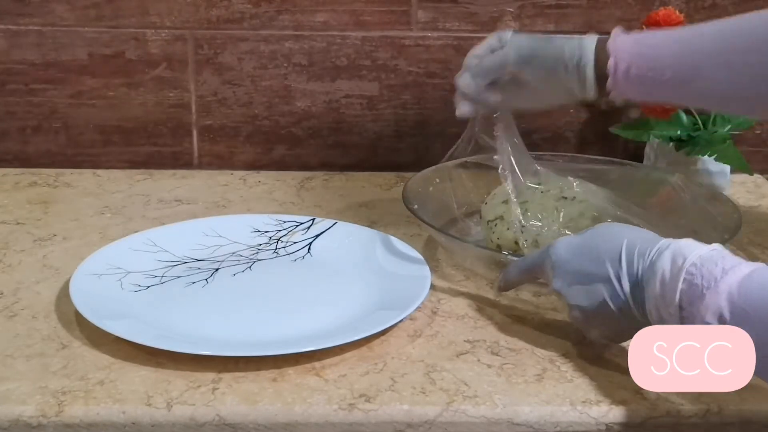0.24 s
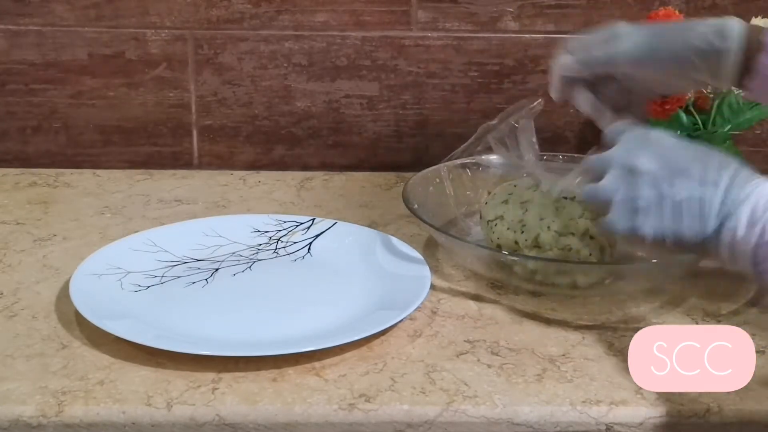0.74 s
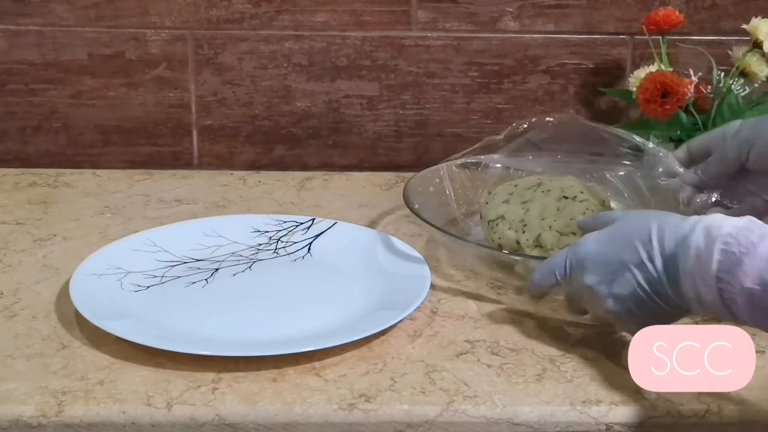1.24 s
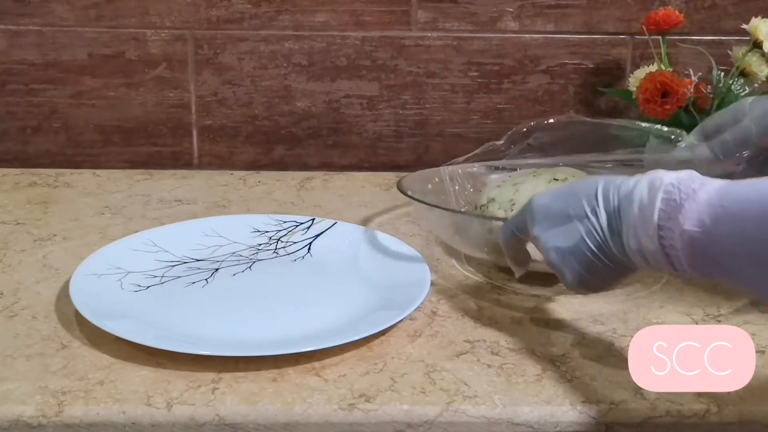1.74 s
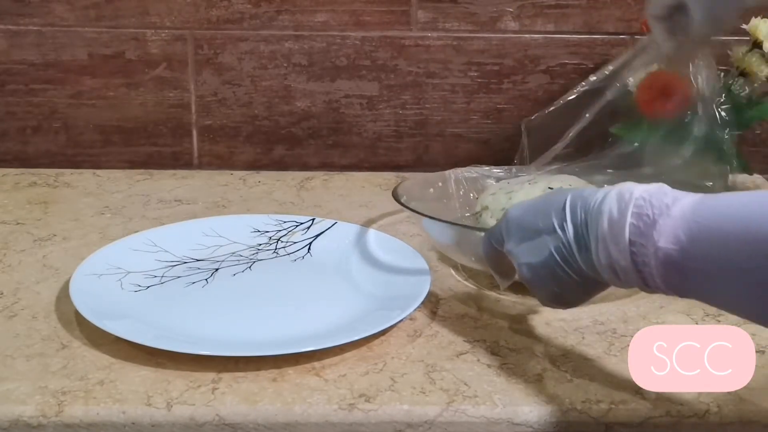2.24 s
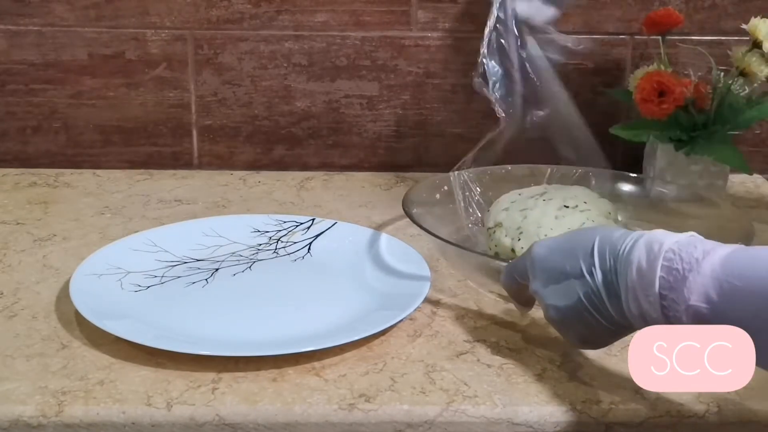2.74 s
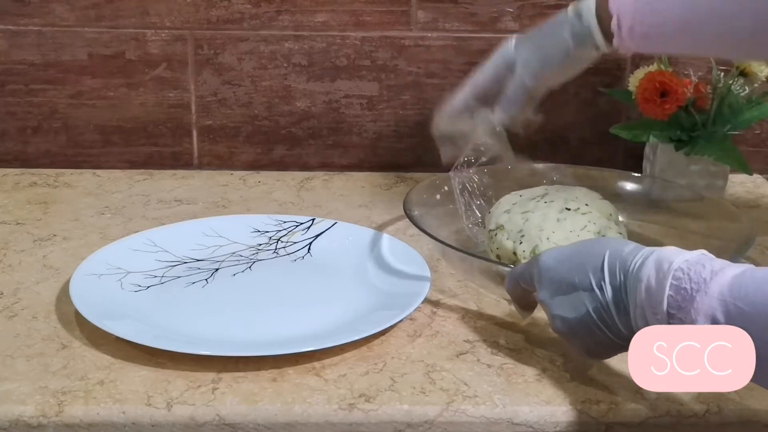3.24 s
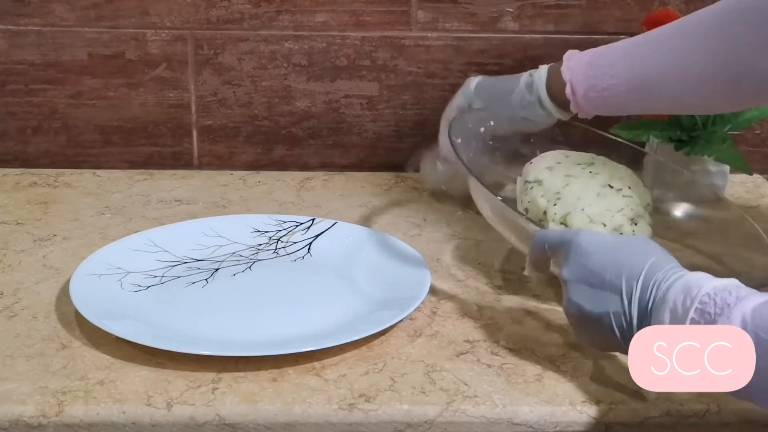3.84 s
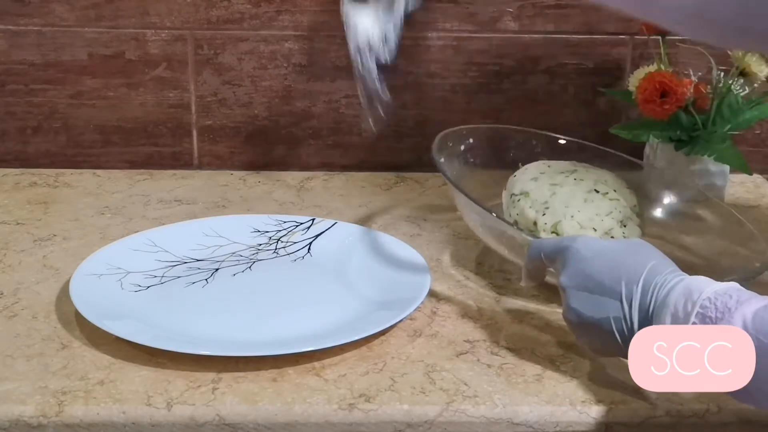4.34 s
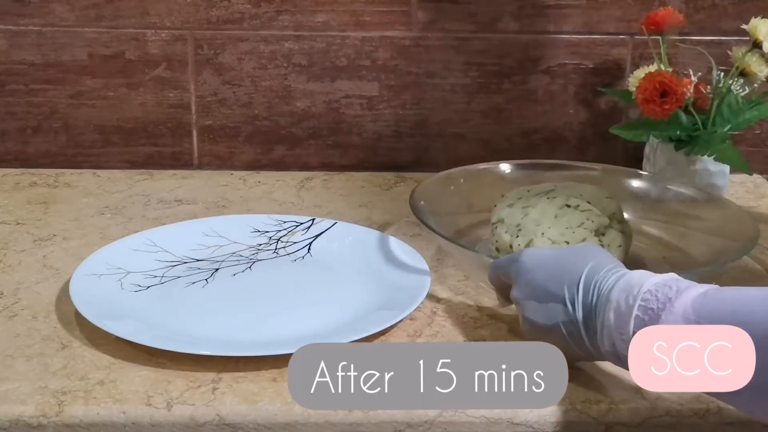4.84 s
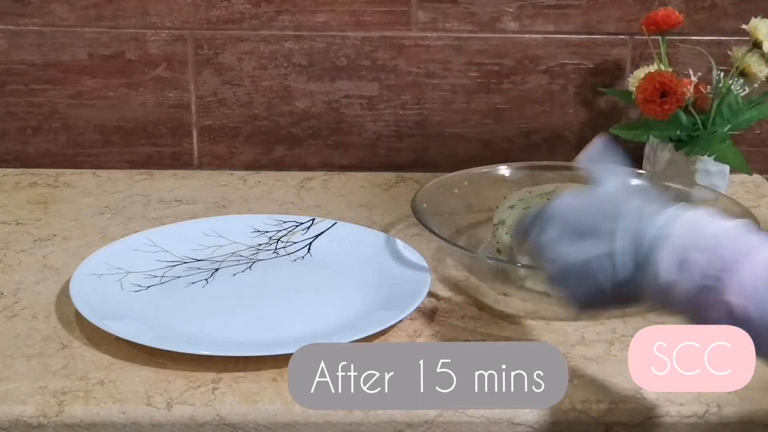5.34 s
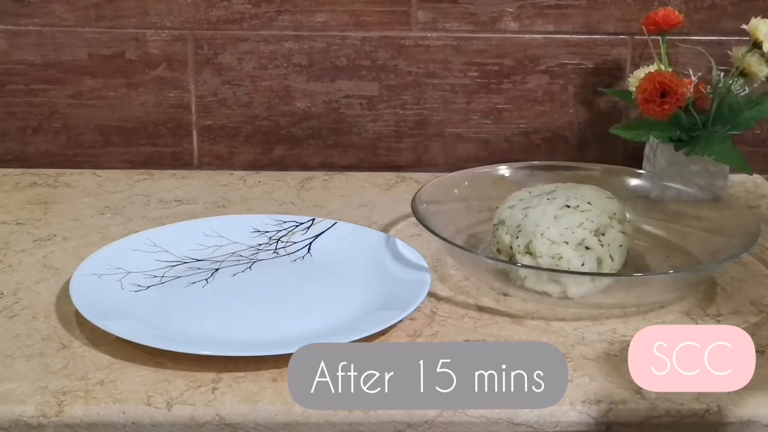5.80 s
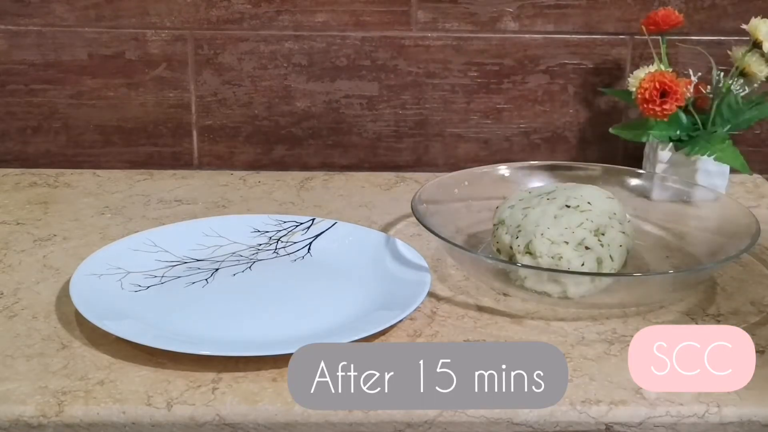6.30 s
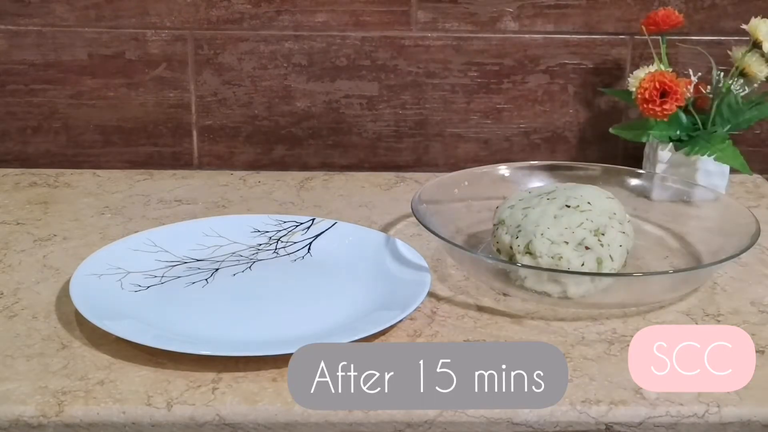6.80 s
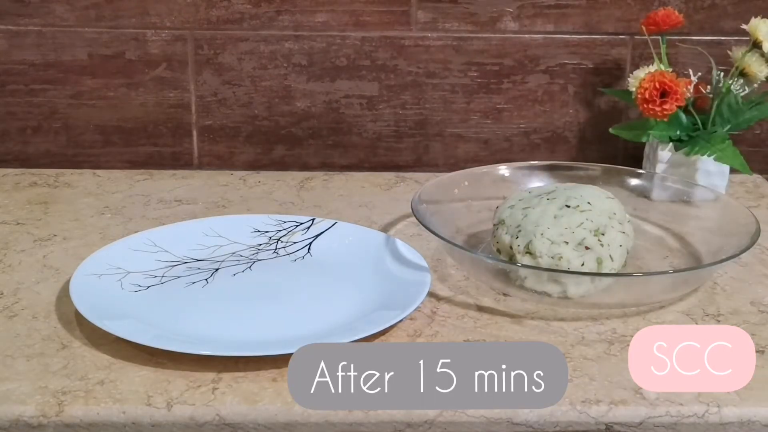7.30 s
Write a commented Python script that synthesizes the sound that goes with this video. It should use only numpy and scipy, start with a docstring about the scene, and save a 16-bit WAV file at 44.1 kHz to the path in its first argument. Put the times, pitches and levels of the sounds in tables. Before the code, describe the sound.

Close, quiet stereo recording in a tiled kitchen. Cling film crinkles faintly, then crackles harder as gloved hands peel it from a heavy glass bowl. The bowl clunks on the stone counter, gloves scuff and catch on the glass, and a last sharp rip frees the film. A soft brush follows as the bowl is lowered, then off-side crumpling and a few bright ticks over faint hiss.

```python
"""Cling film crinkles as gloved hands peel it off a glass bowl in a tiled kitchen: random crease snaps, filtered.
Gloves rub on the bowl: grainy noise and gliding friction tones. The bowl knocks on a stone counter: filtered clicks
and decaying sines. Sharp ticks are band-passed clicks; a soft brush is shaped noise as the bowl is lowered.
The film is crumpled off to the right and put down with a few ticks, over rumble, hiss and hum.
The sound stops shortly before the end."""
import sys
import numpy as np
from scipy import signal
from scipy.fft import rfft, irfft
from scipy.io import wavfile
from scipy.ndimage import uniform_filter1d

SR = 44100
rng = np.random.default_rng(int(sys.argv[2]) if len(sys.argv) > 2 else 0)


def dump(signal):
    """Clip the signal to [-1, 1] and save it as 16-bit WAV at the path in sys.argv[1]."""
    limited = np.clip(np.atleast_2d(signal).T, -1, 1)
    pcm = np.round(limited * 32767).astype(np.int16)
    wavfile.write(sys.argv[1], SR, pcm)


N = 333275
TIME_S = np.arange(N) / SR

# Levels are relative: each source also has its own gains. Pan is left over right.
# pulls or squeezes of the film: start_s, swell_s, hold_s, crinkle_level_db, fine_share_db
PULLS = [(0.0, 0.0044, 0.34, -63.5, -20), (0.829, 0.12, 0.019, -58.5, -3), (1.013, .045, 0.022, -65, -18),
         (1.42, 0.047, 0.16, -59, -11), (1.803, .15, 0.08, -53, -5.5), (2.07, 0.033, 0.18, -58, -6),
         (2.358, 0.034, 0.014, -56, -6.5), (2.709, 0.045, 0.094, -48, -6.5), (2.922, 0.016, 0.1, -54, -8.5),
         (3.149, 0.035, 0.023, -60, -11), (3.399, .11, 0.041, -58, -8), (3.611, 0.05, 0.018, -48, -8),
         (3.706, .06, 0.14, -50.5, -6), (3.846, 0.044, 0.085, -47, -8), (3.999, 0.035, 0.047, -45, -14),
         (5.197, .06, 0.031, -65.5, -11), (5.48, .08, 0.034, -62, -10), (5.6, 0.052, 0.11, -55.5, -8),
         (5.692, 0.046, 0.073, -50, -11), (5.874, 0.017, 0.063, -50, -8.5), (6.222, 0.074, 0.025, -52, -12),
         (6.346, 0.029, 0.27, -61.5, -8.5), (7.024, 0.041, 0.13, -65.5, -7.5)]
# folds giving way in a rush of snaps: start_s, level_db, fade_s, fine_share_db, fold_share_db
RUSHES = [(0.0, -62.5, 0.03, -11, 0), (0.11, -65.5, .06, -7, 3.5), (0.305, -51, 0.022, -8, -5),
          (0.36, -67.5, 0.22, -20, -4.5), (0.579, -61, 0.014, -4, -3), (1.17, -70, 0.094, -29, 8.5),
          (1.809, -56.5, 0.027, -15, -0.5), (2.12, -67, 0.026, -8, -7), (2.539, -57.5, 0.04, -1, -11),
          (2.634, -38.5, 0.025, -12, -4.5), (2.771, -49.5, 0.019, -18, 9), (2.929, -42, 0.026, -8, -3.5),
          (4.026, -37, 0.022, -6, -9), (5.619, -49, 0.047, -7, -32.5), (5.99, -53, 0.059, -22, -1.5),
          (6.059, -44, 0.037, -36, -0.5), (6.108, -37.5, 0.0096, -11, -6), (6.29, -54, 0.021, -12.5, -2.5),
          (6.511, -50.5, 0.011, -3, -2), (6.729, -49.5, 0.016, -2, -13)]
# spectrum of ordinary crinkle: freq_hz, level_db
CRINKLE_COLOUR = [(1500, -40), (3000, -22.5), (4200, -14), (5300, -5), (6400, -5.5), (7150, 3), (8000, -6),
                  (9000, -13), (10200, -14), (12000, -29), (16000, -39)]
# spectrum of the finest snaps: freq_hz, level_db
FINE_COLOUR = [(7000, -24.5), (9500, -2.5), (11000, -2), (12500, -1.5), (13800, -1.5), (15000, -4),
               (16000, -1)]
# spectrum of the big folds: freq_hz, level_db
FOLD_COLOUR = [(300, -45.5), (900, -7.5), (1500, -3), (2300, -1.5), (3100, 0), (3700, -4), (4300, -10.5),
               (6000, -16.5)]
# position of the film: time_s, pan_db
FILM_PAN = [(0, 1), (2, -2), (4.2, -1.5), (5.6, -1.5), (6.3, -2.5), (6.75, -5), (7.3, -2)]
# a glove shifts its grip on the bowl: start_s, hold_s, level_db
SCUFFS = [(0.149, 0.062, -68), (0.295, 0.012, -57.5), (0.89, 0.14, -72), (1.981, 0.05, -59),
          (2.108, .02, -60), (2.277, 0.14, -62), (2.758, 0.095, -47.5), (2.915, 0.035, -56),
          (3.433, 0.1, -66.5), (3.637, .035, -53.5), (3.87, 0.092, -70.5), (4.51, 0.24, -67),
          (5.82, 0.28, -65.5), (6.042, 0.035, -58.5)]
# spectrum of the rubbing: freq_hz, level_db
RUB_COLOUR = [(150, -15), (400, -3), (650, -0.5), (880, 1), (1150, 0), (1550, -9.5), (2300, -18.5),
              (4000, -45.5)]
# stick-slip as the bowl is tipped up and let back, one list per stroke: time_s, level_db, pitch_hz
SLIPS = [
    [(3.54, -74, 1063), (3.62, -62, 1180), (3.65, -47, 1134), (3.68, -69, 993)],
    [(4.0, -53.5, 880), (4.04, -54, 1105), (4.075, -52, 776), (4.17, -87, 770)],
]
# faint glove squeak: time_s, level_db, pitch_hz
SQUEAK = [(5.22, -82, 2920), (5.27, -69, 2972), (5.3, -82, 2895)]
# bowl meets counter: start_s, strength_db, contact_cutoff_hz, thump_share_db
KNOCKS = [(1.448, -22, 1090, -33), (1.461, -14.5, 3470, -37), (1.467, -3.5, 2560, -28),
          (1.474, -19, 1510, -31), (1.81, -27, 2480, -7), (2.6271, -22, 910, -16.5),
          (2.636, -16, 3514, -23.5), (2.656, 5, 2470, -30.5), (2.662, -14, 1700, 2.5),
          (2.931, -24, 3460, -26), (4.966, -17.5, 1430, -13), (4.981, -34.5, 1430, 15.5),
          (6.118, -23.5, 1163, -11)]
# spectrum of the contact: freq_hz, level_db
KNOCK_COLOUR = [(120, -36), (230, -1), (380, -16.5), (550, 3.5), (850, -4), (1150, 0), (1500, -3),
                (2100, -11.5), (2800, -10.5), (3600, -32), (6000, -41)]
# ringing modes of the loaded bowl on the counter: freq_hz, level_db, t60_s
BOWL_MODES = [(206.6, -10, 0.6), (312, -15, 0.07), (446, -15.5, 0.2), (521.4, 1, 0.46), (600, -12.5, 0.79),
              (664, -16, .3), (728, -0.5, 0.64), (847, -5.5, 0.65), (870, -1, 0.3), (983, -13.5, 0.13),
              (1130, -6.5, 0.5), (1280, -6, 0.29), (1220, -11, .3), (1440, -14, 0.4), (1480, -15.5, 0.27),
              (1630, -14, .45), (2590, -12.5, 0.34)]
# single sharp ticks: start_s, energy_db, centre_hz, width_hz, pan_db
TICKS = [(1.437, -38, 5500, 3000, 1), (1.811, -28, 6600, 4000, -1.5), (2.6282, -21, 5670, 1800, -14),
         (2.634, -21, 6400, 3497, 4.5), (2.636, -9.5, 6280, 3000, -1), (2.643, -15, 6880, 1795, -23),
         (2.93, -25, 6700, 4030, -1), (4.029, -28, 6930, 3500, 6), (5.372, -27.5, 7300, 1090, -8.5),
         (5.831, -24, 6800, 4000, 5), (6.112, -13, 6760, 4020, -1.5), (6.516, -26, 6900, 3950, 1.5),
         (6.6946, -16, 7370, 2590, -4.5), (6.6942, -26, 12600, 5000, -7.5),
         (6.7306, -18.5, 12600, 5020, -13.5), (6.7415, -25.5, 12500, 5000, -8),
         (6.882, -32.5, 6800, 3000, -2), (6.9241, -1, 6300, 2020, -8), (6.9244, -22.5, 11600, 7000, -11),
         (6.923, -20, 3190, 655, -3.5), (6.924, -32, 950, 497, -13), (7.130, -28.5, 7000, 2490, 3.5)]
# soft brushing, likely the sleeve, as the bowl is lowered: time_s, level_db
BRUSH = [(4.3, -91), (4.36, -65), (4.45, -52.5), (4.58, -50.5), (4.7, -55.0), (4.8, -56.5), (4.9, -61.5),
         (4.93, -98)]
# spectrum of the brushing: freq_hz, level_db
BRUSH_COLOUR = [(300, -18), (700, -9.5), (1100, -6), (1700, -12.5), (2500, -14.5), (3200, -8.5),
                (4000, -16.5), (5300, -2), (6100, 1), (6500, -3), (7050, 4), (8600, -5), (11000, -15.5),
                (15500, -20)]
# spectrum of rumble and hiss: freq_hz, level_db
FLOOR_COLOUR = [(12, -39), (20, 7), (181, -1.5), (326, -4), (524, -4), (603, -9.5), (713, -10),
                (1390, -18.5), (2960, -16), (4020, -22), (6290, -15.5), (7230, -10), (9300, -26),
                (14500, -26), (15800, -20.5)]
# appliance hum: freq_hz, rms_db
HUM = [(59.3, -76), (118.6, -77), (176, -78.5), (234, -80.5)]
# decay of the room: freq_hz, t60_s
ROOM_T60 = [(150, 0.75), (400, 0.5), (1000, 0.32), (2800, 0.42), (6000, 0.44), (9000, 0.29), (15000, 0.39)]
# likeness of left and right in diffuse sound: freq_hz, correlation
ROOM_LIKENESS = [(30, .35), (70, 0.036), (150, 0.44), (300, 0.56), (650, 0.25), (1400, 0), (4000, 0.022)]

PULL_RELAX_S = 0.035  # time for the crinkle amplitude to fall by 1/e
PULL_FOLD_SHARE_DB = -7.5  # big folds against crinkle
RESTING_DB, RESTING_FINE_SHARE_DB, RESTING_FOLD_SHARE_DB = -73, -7.5, -5
SCUFF_SWELL_S, SCUFF_RELAX_S = 0.012, 0.022
RUB_WITH_FILM_DB, RUB_WITH_SLEEVE_DB, RUB_RESTING_DB = -18.5, -17.5, -79
TICK_LAG_S_PER_DB = 0.000035
FLOOR_RMS_DB = -66
END_S, CUTOFF_HZ = 7.288, 15900


def film(rooms, powers, crinkle_db=0.86, fine_db=0.7, fold_db=-0.55):
    """Creases snap all over the sheet: big folds sound low, tiny ones high."""
    sizes = np.sqrt(powers) * from_db([[crinkle_db], [fine_db], [fold_db]])
    creases = [size * snaps(per_s=3200, spread_db=2.5, clump_db=3.5, clump_s=0.006) for size in sizes]
    colours = (CRINKLE_COLOUR, FINE_COLOUR, FOLD_COLOUR)
    # every crease lies at one of several places, each with its own echoes and arrival lag
    place = rng.integers(0, len(rooms), N)
    out = 0
    for k, room in enumerate(rooms):
        dry = sum(colour(clicks * (place == k), spectrum) for clicks, spectrum in zip(creases, colours))
        out = out + in_room(dry, room, direct_db=-5.5, lag_samples=5 * k)
    return out * panned(curve(FILM_PAN))


def flexing():
    """Powers of crinkle, finest snaps and big folds: slack film, pulls and rushes add up."""
    def levels(db, fine_share_db, fold_share_db):
        return from_db(db + np.array([[0], [fine_share_db], [fold_share_db]]))

    powers = np.ones(N) * levels(RESTING_DB, RESTING_FINE_SHARE_DB, RESTING_FOLD_SHARE_DB) ** 2
    for start_s, swell_s, hold_s, db, fine_share_db in PULLS:
        top = levels(db, fine_share_db, PULL_FOLD_SHARE_DB)
        add(powers, start_s, (top * gesture(swell_s, hold_s, PULL_RELAX_S)) ** 2)
    for start_s, db, fade_s, fine_share_db, fold_share_db in RUSHES:
        top = levels(db, fine_share_db, fold_share_db)
        add(powers, start_s, (top * np.exp(-TIME_S[:SR // 2] / fade_s)) ** 2)
    return powers


def gesture(swell_s, hold_s, relax_s):
    """One hand movement, a second long: linear swell, hold, exponential release."""
    t = TIME_S[:SR]
    swell = np.minimum(t / swell_s, 1)
    return swell * np.exp(-np.maximum(t - swell_s - hold_s, 0) / relax_s)


def snaps(per_s, spread_db, clump_db, clump_s):
    """Contacts snap at random, mostly small, a few large, in little avalanches; rms 1."""
    sizes = from_db(spread_db * np.minimum(rng.exponential(1, N), 4))
    signs = rng.choice([-1, 1], N)
    clumps = np.interp(TIME_S / clump_s, np.arange(N), np.clip(rng.standard_normal(N), -2, 2))
    happens = rng.random(N) < per_s / SR
    return rms_one(sizes * signs * happens * from_db(clump_db * clumps))


def rubbing(room, crinkle_power, rub_db=-1.0):
    """Gloves, film and counter rub on the bowl: dull grainy scuff, short tones where contact catches."""
    grains = snaps(per_s=2000, spread_db=1.5, clump_db=2.0, clump_s=0.012)
    scuff = colour(from_db(rub_db) * rub_level(crinkle_power) * grains, RUB_COLOUR)
    tones = sum(stick_slip(stroke, width_hz=246) for stroke in SLIPS) + stick_slip(SQUEAK, width_hz=62)
    return in_room(scuff + tones, room, direct_db=-3.5) * panned(pan_db=-1.5)


def rub_level(crinkle_power):
    """Rubbing strength follows the film and the arm, and rises at each change of grip."""
    with_film = from_db(RUB_WITH_FILM_DB) ** 2 * crinkle_power
    with_sleeve = from_db(curve(BRUSH) + RUB_WITH_SLEEVE_DB) ** 2
    power = from_db(RUB_RESTING_DB) ** 2 + with_film + with_sleeve
    for start_s, hold_s, db in SCUFFS:
        add(power, start_s, (from_db(db) * gesture(SCUFF_SWELL_S, hold_s, SCUFF_RELAX_S)) ** 2)
    return np.sqrt(power)


def stick_slip(stroke, width_hz):
    """Unsteady friction tone: low-passed noise modulates a carrier that follows the stroke's pitch."""
    low_pass = signal.butter(2, width_hz / 2, fs=SR, output="sos")
    waver = signal.sosfilt(low_pass, rng.standard_normal((2, N)))
    phase = 2 * np.pi * np.cumsum(curve(stroke, column=2)) / SR
    tone = rms_one(waver[0] * np.cos(phase) + waver[1] * np.sin(phase))
    return tone * from_db(curve(stroke)) * during(stroke)


def bowl(room, ring_db=-43.5, thump_hz=(130, 380), hollow_hz=(720, 1150), hollow_db=7.0):
    """Glass damped by dough and a hand: short hollow clunk, faint ring, thump in the counter."""
    blows, thumps = np.zeros(N), np.zeros(N)
    thump = pulse(thump_hz, "band")
    thump = thump / np.linalg.norm(thump)
    for start_s, db, cutoff_hz, thump_db in KNOCKS:
        add(blows, start_s, from_db(db) * pulse(cutoff_hz, "low", order=3))
        add(thumps, start_s, from_db(db + thump_db) * thump)
    t = TIME_S[:SR]
    ring = 0
    for hz, db, t60_s in BOWL_MODES:
        # phases differ more between channels at high frequency
        phase = hz / 1500 * rng.standard_normal((2, 1))
        ring = ring + from_db(db) * np.sin(2 * np.pi * hz * t + phase) * np.exp(-np.log(1000) * t / t60_s)
    contact = colour(blows, KNOCK_COLOUR)
    # the hollow of the bowl takes a cycle or two to swing up
    hollow = from_db(hollow_db) * convolve(contact, pulse(hollow_hz, "band"))
    clunk = in_room(from_db(-1.0) * (contact + hollow) + thumps, room, direct_db=-7.5)
    return (clunk + from_db(ring_db) * convolve(blows, ring)) * panned(pan_db=-2.0)


def ticks(room, direct_db=-6.5, room_db=-4.5):
    """Band-passed clicks ring for a few cycles, weaker and later in the far channel."""
    direct, source = np.zeros((2, N)), np.zeros(N)
    for start_s, db, hz, width_hz, pan_db in TICKS:
        tick = pulse([hz - width_hz / 2, hz + width_hz / 2], "band", order=3)
        tick = from_db(db) * tick / np.linalg.norm(tick)
        left, right = panned(pan_db) * tick
        add(direct[0], start_s - pan_db * TICK_LAG_S_PER_DB, left)
        add(direct[1], start_s, right)
        add(source, start_s, tick)
    return from_db(direct_db) * direct + from_db(room_db) * convolve(source, room) * panned(pan_db=-3.0)


def brush(rooms, level_db=1.0):
    """Countless fibres slip along a moving sleeve: smooth hiss, a little to the left."""
    level = from_db(curve(BRUSH) + level_db) * during(BRUSH) / np.sqrt(len(rooms))
    hiss = sum(convolve(colour(level * rng.standard_normal(N), BRUSH_COLOUR), room) for room in rooms)
    return hiss * panned(pan_db=2.1)


def background():
    """Quiet rumble and hiss as coloured noise; appliance hum as steady sines."""
    hum = 0
    for hz, rms_db in HUM:
        hum = hum + from_db(rms_db) * np.sqrt(2) * np.sin(2 * np.pi * (hz * TIME_S + rng.random()))
    return from_db(FLOOR_RMS_DB) * colour(diffuse(N), FLOOR_COLOUR) + hum


def kitchen(first_echo_s=0.0026, grain_db=5.0, grain_s=0.056, size=32768):
    """Tiled-room response, unit energy: distinct early echoes merge into a tail that dies band by band."""
    t, hz = np.arange(size) / SR, np.arange(size // 2 + 1) * SR / size
    lumps = rms_one(uniform_filter1d(rng.standard_normal((2, size)), size=32, axis=1))
    echoes = from_db(grain_db * np.clip(lumps, -2, 2) * np.exp(-t / grain_s))
    noise, tail = rfft(diffuse(size)), 0
    edges_hz = np.r_[0, np.geomspace(150, SR / 2, 12)]
    for low_hz, high_hz in zip(edges_hz, edges_hz[1:]):
        t60_s = at_hz(ROOM_T60, (low_hz + high_hz) / 2)
        band = irfft(noise * (hz >= low_hz) * (hz < high_hz))
        band = band * np.exp(-np.log(1000) * t / t60_s) / np.sqrt(t60_s)
        # single echoes stand out in the treble only; long waves blur them
        tail = tail + (band * echoes if low_hz > 1200 else band)
    tail = tail * np.minimum(t / first_echo_s, 1) ** 2
    return tail / np.linalg.norm(tail, axis=1, keepdims=True)


def in_room(x, room, direct_db, lag_samples=0):
    """Direct sound, lagging at left, plus the room's answer, at constant power."""
    direct = from_db(direct_db)
    channels = np.vstack([np.roll(x, lag_samples, axis=-1), x])
    return (direct * channels + convolve(x, room)) / np.sqrt(1 + direct ** 2)


def diffuse(size):
    """White stereo noise whose channels are partly alike at low frequency."""
    mid, side = rfft(rng.standard_normal((2, size)))
    alike = at_hz(ROOM_LIKENESS, np.arange(len(mid)) * SR / size)
    spectrum = np.sqrt(1 + alike) * mid + np.sqrt(1 - alike) * side * [[1], [-1]]
    return irfft(spectrum, size) / np.sqrt(2)


def panned(pan_db):
    """Left and right gains of constant power."""
    gains = from_db(np.array([[0.5], [-0.5]]) * pan_db)
    return gains / np.sqrt(np.mean(gains ** 2, axis=0))


def colour(x, spectrum, size=4096):
    """Causal minimum-phase filter of unit energy with the given spectrum, via the folded cepstrum."""
    hz = np.arange(size // 2 + 1) * SR / size
    cepstrum = irfft(np.log(from_db(at_hz(spectrum, hz))))
    cepstrum[1:size // 2] *= 2
    cepstrum[size // 2 + 1:] = 0
    response = irfft(np.exp(rfft(cepstrum)))
    return convolve(x, response / np.linalg.norm(response))


def pulse(edges_hz, kind, order=2, size=2048):
    """A click through a Butterworth filter."""
    sos = signal.butter(order, edges_hz, kind, fs=SR, output="sos")
    return signal.sosfilt(sos, signal.unit_impulse(size))


def convolve(x, response):
    """Pass a signal through one response per channel."""
    return signal.fftconvolve(np.atleast_2d(x), np.atleast_2d(response), axes=1)[:, :N]


def add(out, start_s, sound):
    """Mix in a short sound at a given time."""
    i = max(int(start_s * SR), 0)
    out[..., i:i + sound.shape[-1]] += sound[..., :N - i]


def curve(rows, column=1):
    """Interpolate one column over time, held at its ends."""
    rows = np.array(rows)
    return np.interp(TIME_S, rows[:, 0], rows[:, column])


def during(rows):
    """True between the first and last times of a table."""
    return (TIME_S > rows[0][0]) * (TIME_S < rows[-1][0])


def at_hz(points, hz):
    """Interpolate a table on a log-frequency axis."""
    table_hz, value = np.transpose(points)
    return np.interp(np.log(np.maximum(hz, 1)), np.log(table_hz), value)


def from_db(db):
    """Decibels to gain."""
    return 10 ** (np.asarray(db) / 20)


def rms_one(x):
    """Scale to unit rms."""
    return x / np.sqrt(np.mean(x ** 2) + 1e-20)


def scene(place_count=5):
    """All sources share one kitchen, with one room response per place on the counter."""
    rooms = [kitchen() for _ in range(place_count)]
    powers = flexing()
    handling = film(rooms, powers) + rubbing(rooms[2], powers[0])
    impacts = bowl(rooms[0]) + ticks(rooms[-1])
    return handling + impacts + brush(rooms[:2]) + background()


def record(dry):
    """Stop the sound near the end; cut the top steeply."""
    on = np.clip((END_S - TIME_S) / 0.0026, 0, 1)
    low_passed = convolve(dry * on, signal.firwin(129, CUTOFF_HZ, fs=SR))
    # undo the filter's 64-sample delay
    return low_passed[:, np.minimum(np.arange(N) + 64, N - 1)]


dry = scene()
out = record(dry)
dump(out)
```